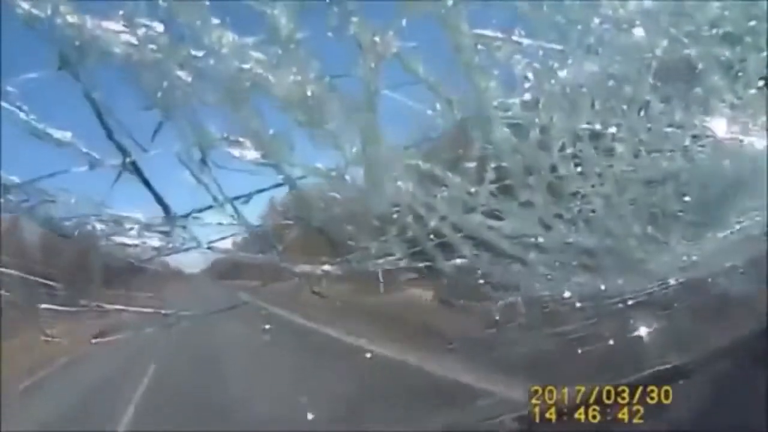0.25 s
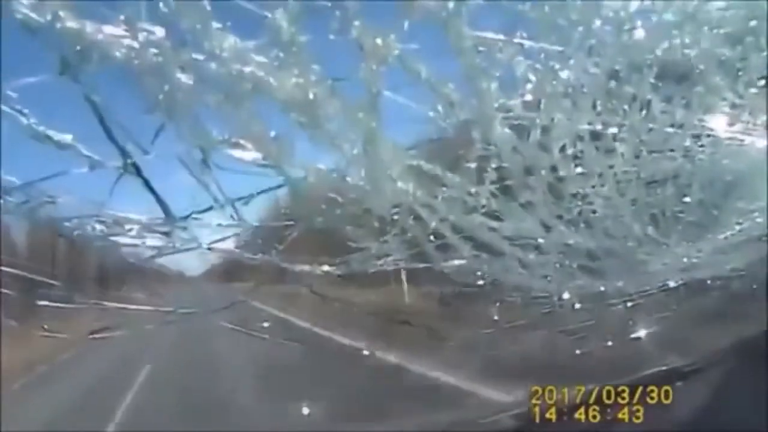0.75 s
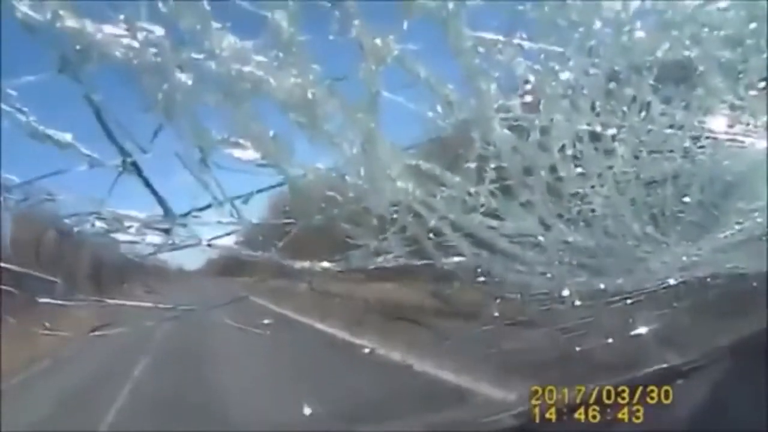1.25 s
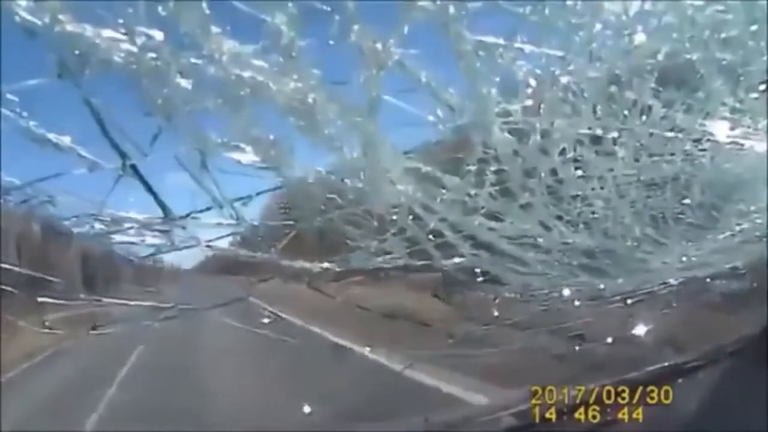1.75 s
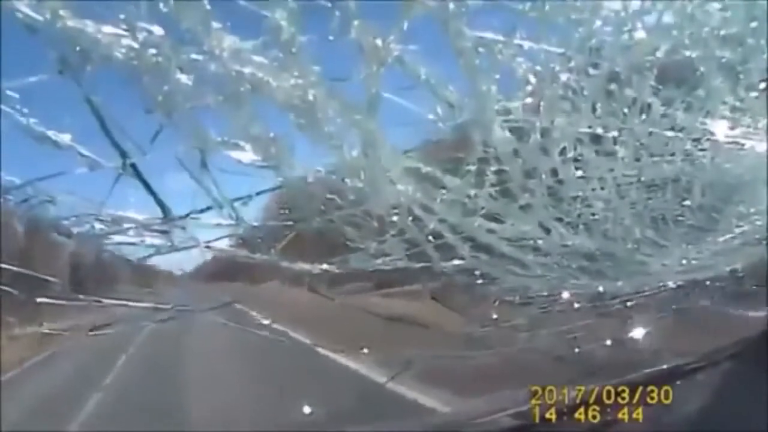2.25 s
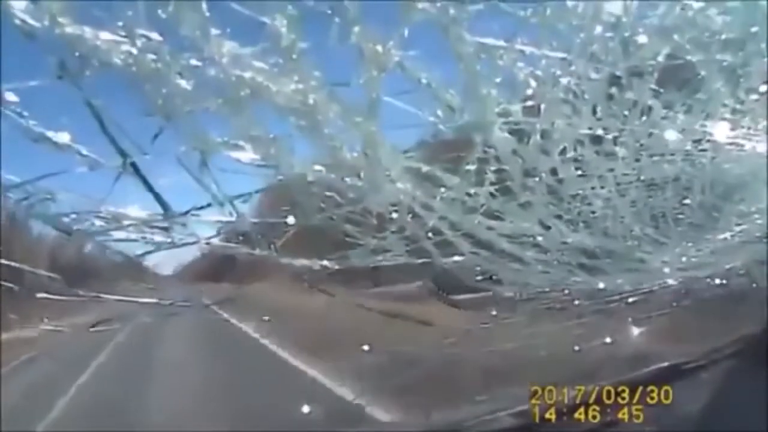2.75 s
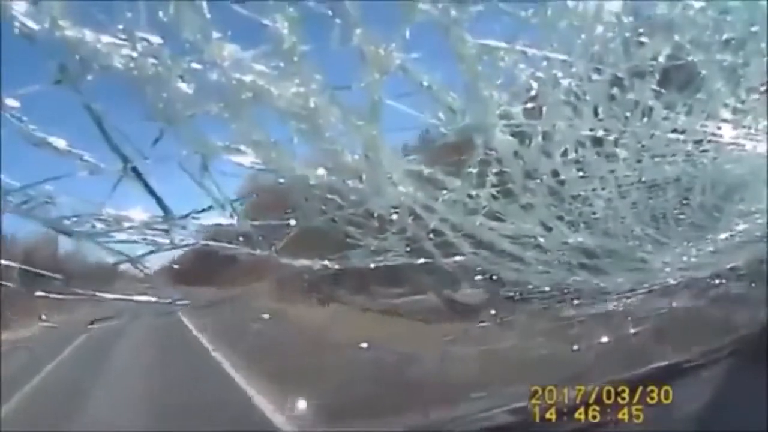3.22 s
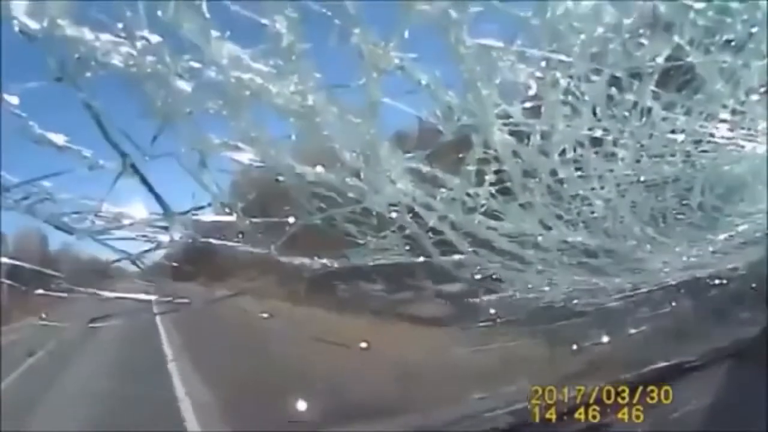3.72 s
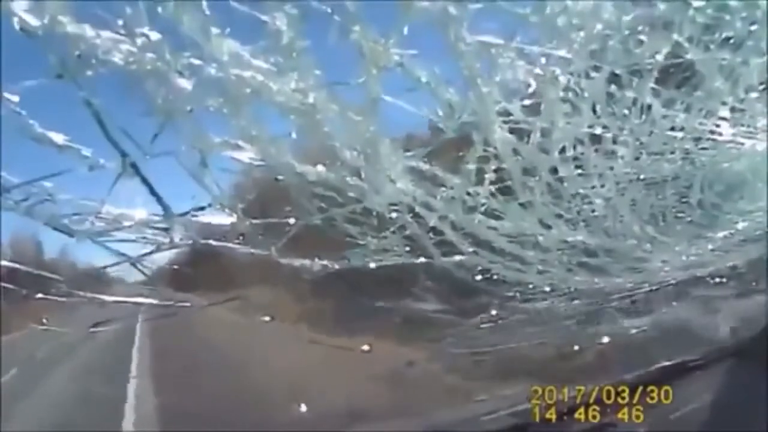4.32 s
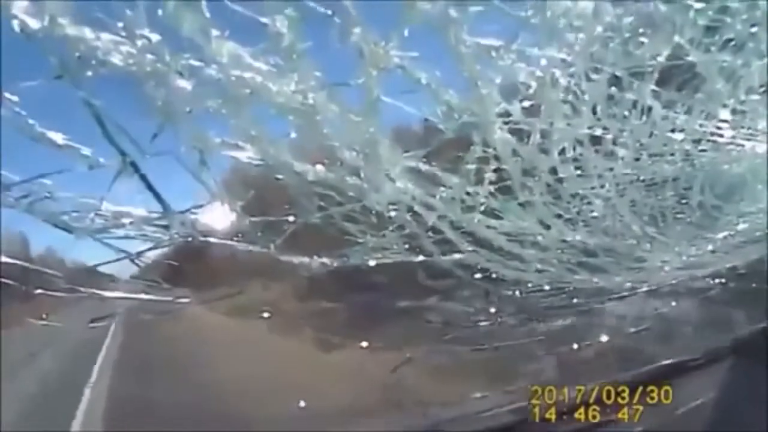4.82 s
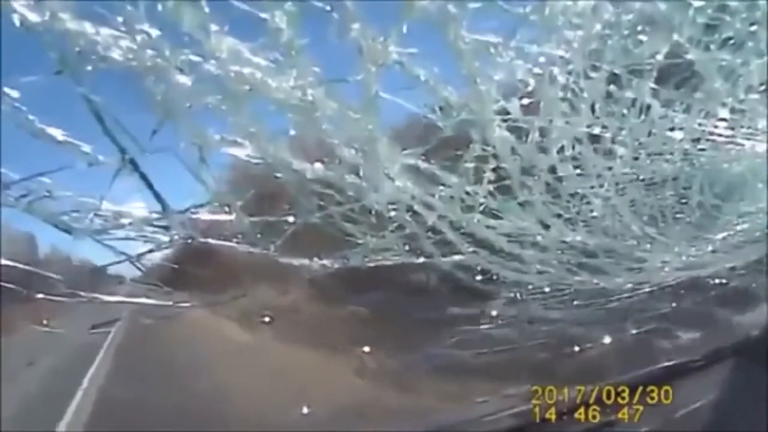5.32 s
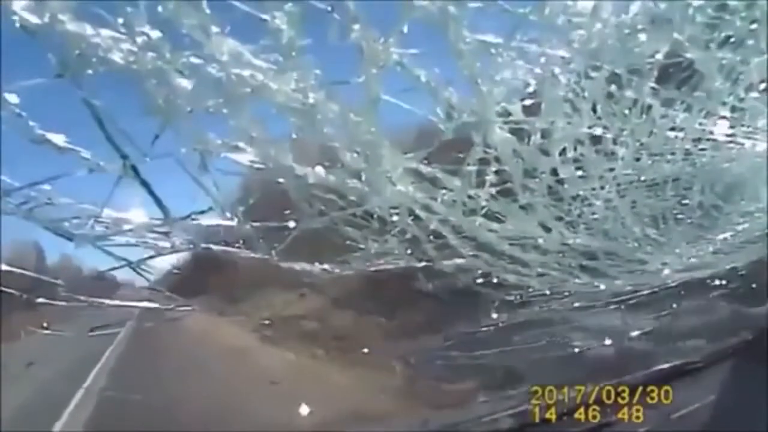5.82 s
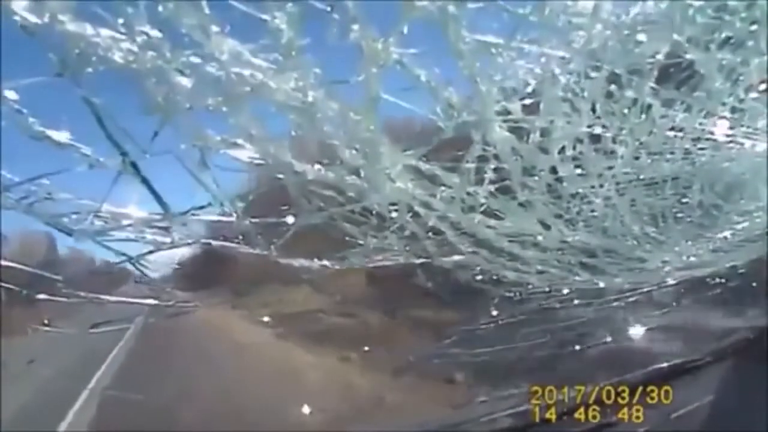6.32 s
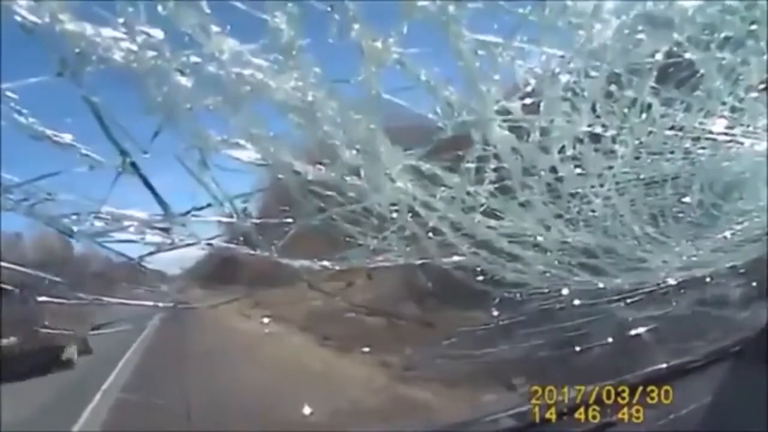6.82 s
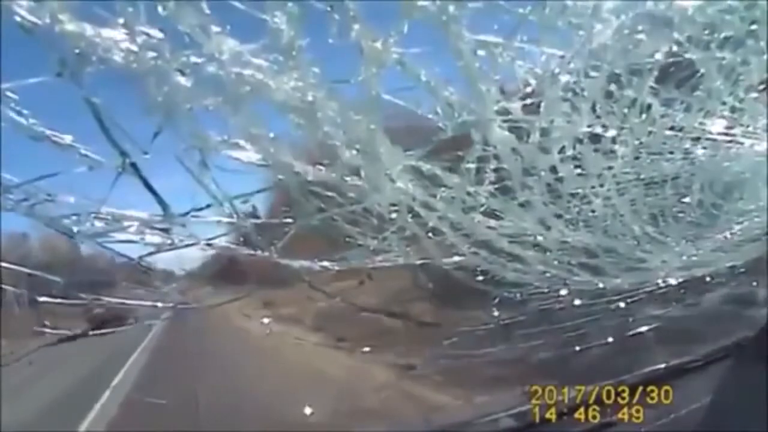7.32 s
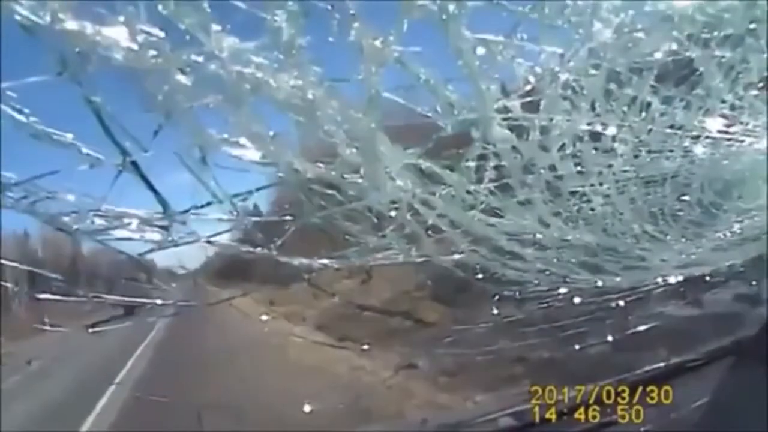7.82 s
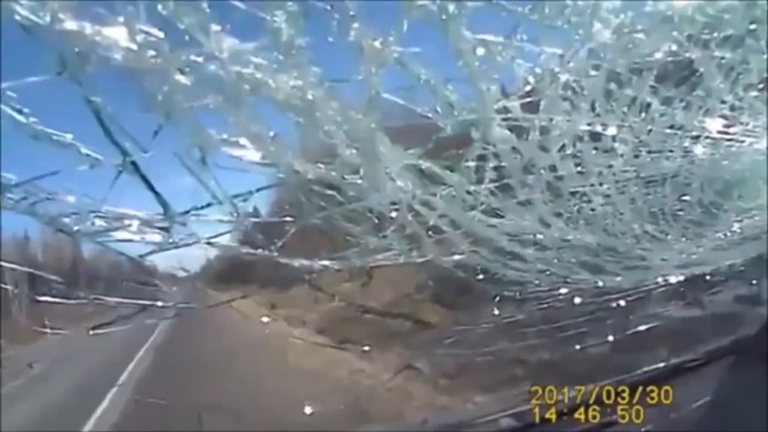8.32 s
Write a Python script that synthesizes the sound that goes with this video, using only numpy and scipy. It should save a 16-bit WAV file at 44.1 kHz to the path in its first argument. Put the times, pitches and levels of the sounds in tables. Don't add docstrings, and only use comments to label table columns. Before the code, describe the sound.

Inside a car cabin, through a cheap, muffled dashboard camera with constant hiss, a thin high buzzing whine and small watery dropouts. From 0 to 3 s, broad tyre roar, low body rumble and airy wind past shattered glass gradually fade as the car slows. Two light knocks come at about 3.0 and 3.1 s. From 3.4 to 3.9 s it bumps hard onto the verge: dense, hollow dash clatter, deep body thuds and brittle glass ticks, hardest near 3.7 s, harshly overloaded, with a deep flutter of cabin air. Smaller rattles and ticks follow at 4.0 to 4.35 s, and a faint knock at 4.7 s. The cabin is then quieter. Another car's tyre noise rises from about 5 s, swells at 6.1 and strongest at 6.7 s, then recedes, duller, to 8.5 s. A slight knock sounds at 6.3 s, a short clatter at 7.3 s and a glass tick at 7.5 s.

```python
import sys
import numpy as np
from scipy import signal
from scipy.fft import rfft, irfft, next_fast_len
from scipy.io import wavfile
from scipy.ndimage import uniform_filter1d

SR = 44100
rng = np.random.default_rng(int(sys.argv[2]) if len(sys.argv) > 2 else 0)


def dump(signal):
    limited = np.clip(np.atleast_2d(signal).T, -1, 1)
    pcm = np.round(limited * 32767).astype(np.int16)
    wavfile.write(sys.argv[1], SR, pcm)


def voltage_ratio(level):
    return 10 ** (np.asarray(level, float) / 20)


N = 377496

# (frequency [Hz], level per Hz [dB])
HISS = [(100, -45), (400, -1.5), (1500, -6), (3500, -5.5), (5000, -5), (6500, -1.5), (7300, 1)]
WHINE_HZ = [1810.6, 2935.95, 4061.3, 5186.65, 6312.0, 7437.35]
WHINE_DB = [-48, -50, -44, -39, -31.5, -21.5]
# (frequency [Hz], average level [dB])
CLOCK = [(1125.35, -50), (2250.7, -55)]
# (frequency [Hz], level per Hz [dB])
BUFFET = [(15, -22), (25, -2), (45, 2), (80, -9), (120, -7.5)]
# (time [s], peak level [dB], half length [s])
GUSTS = [
    (3.7, -32, .55),
    (5.3, -42, .3),
    (6.3, -42, .3),
    (7.4, -40, .4),
]
# (frequency [Hz], level per Hz [dB])
WIND = [(1200, -33), (1600, -2), (2000, 3), (2600, 6.5), (3100, -2.5), (4500, -6), (7000, -12)]
# (frequency [Hz], level per Hz [dB])
ALONGSIDE = [(180, -41), (300, -19), (362, -25.5), (444, -12), (589, -6), (696, -3.5), (924, -0.5),
             (1180, -3.5), (1700, -25), (2210, -39), (3740, -120)]
# (frequency [Hz], level per Hz [dB])
LEAVING = [(180, -48), (300, -39), (387, -7.5), (419, -31), (460, -7), (589, -6), (643, 2.5), (823, 2),
           (1700, -18.5), (2210, -56), (3740, -120)]
LEAVES_S = [7.3, 7.67]
# (time [s], level [dB])
OTHER_CAR = [
    (4.7, -52),
    (5.3, -40),
    (6.11, -26.5),
    (6.32, -32),
    (6.73, -24.5),
    (7.3, -28.5),
    (7.65, -30.5),
    (7.9, -28.5),
    (8.3, -31),
]
# (frequency [Hz], level per Hz [dB])
RUMBLE = [(24, -56), (40, -20.5), (124, -4), (188, -3.5), (238, -5.5), (313, -0.5), (450, -10), (580, -48),
          (990, -120)]
# (frequency [Hz], level per Hz [dB])
ROAR = [(240, -14), (400, -3), (476, -4), (633, 3), (757, 3), (855, -0.5), (938, 2.5), (1050, 3),
        (1600, -12.5), (2080, -40), (3520, -120)]
# (time [s], level [dB])
SPEED = [(0, -14.5), (.5, -15), (1.2, -16.5), (1.76, -17.5), (2.2, -21.5), (2.7, -24), (3.05, -23.5),
         (3.42, -28), (4.4, -37.5), (5.0, -38), (5.6, -41.5), (8.56, -41.5)]
# (time of deepest swing [s], peak level [dB], pitch [Hz], length [cycles])
THUDS = [
    (3.454, -18, 110, 1.2),
    (3.471, -14, 191, 1.6),
    (3.633, -11, 61, 0.58),
    (3.7043, 1.5, 109, 0.43),
    (3.722, 0, 212, 0.51),
    (4.039, -24, 191, 2.3),
    (4.189, -27, 175, 2.6),
    (4.261, -21, 245, 1.35),
]
# (time [s], peak level [dB], ring [Hz])
CHIPS = [
    (3.518, -8, 2630),
    (3.742, -29, 3600),
    (3.772, -19, 2460),
    (4.118, -18, 3150),
    (4.257, -12, 1900),
    (4.347, -18, 3000),
    (7.493, -15, 2800),
    (7.283, -18.5, 3400),
]
# (frequency [Hz], width [Hz], level [dB])
PANEL = [(269, 720, -15.5), (500, 140, -3), (760, 1320, -0.5), (1050, 300, 0.5), (1350, 380, -22.5)]
# (frequency [Hz], width [Hz], level [dB])
BRITTLE = [(1400, 630, 0), (1810, 850, 3.5), (2470, 310, 9), (2970, 500, 2), (4000, 1200, -3.5),
           (5070, 490, -5.5), (6200, 1500, -11)]
# (time [s], panel peak [dB], brittle peak [dB], length [s], loudest ring [Hz])
BLOWS = [(3.011, -18, -21, .027, 483), (3.144, -19, -19.5, 0.027, 860), (3.447, 5, .5, 0.083, 760),
         (3.517, -3.5, -8, 0.031, 646), (3.616, 6, 2, 0.031, 760), (3.769, -0.5, -17, 0.038, 1150),
         (3.811, -2, -17, 0.063, 637), (4.037, -21, -17.5, 0.091, 600), (4.109, -40, -27.5, 0.012, 1000),
         (4.252, -8, -11, 0.045, 1080), (4.73, -23, -36, .07, 910), (6.285, -28, -21, .014, 1000),
         (7.282, -8, -14.5, 0.031, 1050)]
# (time [s], panel peak [dB], brittle peak [dB], length [s], loudest ring [Hz])
RATTLES = [(3.466, -3.5, -14, 0.049, 1010), (3.497, -11, -16, .02, 790), (3.527, -6.5, -16, 0.041, 720),
           (3.637, -3, -13, .024, 935), (3.656, -9.5, -22, 0.079, 755), (3.701, -6.5, -16.5, 0.044, 970),
           (3.733, -4, -18, 0.0193, 586), (3.759, -26, -13, 0.014, 850), (3.821, -7, -19.5, 0.093, 860),
           (3.912, -22, -22, .027, 900), (4.042, -16.5, -41, 0.023, 910), (4.175, -13, -23, .016, 1050),
           (4.186, -15.5, -18, 0.032, 1210), (4.238, -12.5, -13.5, 0.015, 500),
           (7.276, -27, -19, 0.0066, 900)]
STARVED_S = [.823, 1.283, 1.463, 1.542, 1.712, 1.977, 2.061, 2.246, 2.823, 3.212, 3.587, 3.895, 3.976, 4.53,
             4.657, 4.893, 4.919, 4.963, 5.107, 5.282, 5.32, 5.404, 5.581, 5.638, 5.703, 5.981, 6.308,
             6.434]
STARVED_LATE_S = [7.046, 7.457, 7.629, 7.815, 7.926, 8.013, 8.112]
THINNED_S = [.328, 1.263, 1.438, 5.021, 5.191, 1.756, 3.406, 3.721, 4.028, 4.572]
# (start [s], end [s])
BUSY = [
    (2.98, 3.06),
    (3.43, 4.36),
    (6.24, 6.34),
    (7.23, 7.36),
    (7.47, 7.56),
]
IMAGE_DB = [-31, -45]


def rms_one(x):
    return x / np.sqrt(np.mean(x ** 2) + 1e-20)


def drift(rate):
    r = np.exp(-80 * np.pi * rate / SR)
    wander = signal.lfilter([1], [1, -2 * r, r * r], rng.standard_normal(N // 40 + 2002))
    return rms_one(wander[2000:])


def gain_of(db):
    return np.interp(np.arange(N) / 40, np.arange(len(db)), voltage_ratio(db))


def coloured(spectrum, shared_db, patchy_db, rate):
    size = next_fast_len(N, real=True)
    log_hz = np.log2(np.fft.rfftfreq(size, 1 / SR) + 1)
    points = np.array(spectrum, float)
    shape = voltage_ratio(np.interp(log_hz, np.log2(points[:, 0]), points[:, 1], left=-90, right=-90))
    noise = rfft(rng.standard_normal(size)) * shape
    together, out = drift(rate), 0
    audible = points[points[:, 1] > -45, 0]
    for centre in np.arange(np.log2(audible[0]), np.log2(audible[-1]) + .5, .5):
        share = np.clip(1 - np.abs(log_hz - centre) * 2, 0, 1)
        band = irfft(noise * share, size)[:N]
        out = out + gain_of(shared_db * together + patchy_db * drift(2 * rate)) * band
    return rms_one(out)


def resonances(x, peaks):
    out = 0
    for k, (hz, width, db) in enumerate(peaks):
        r = np.exp(-np.pi * width / SR)
        b = np.array([1, 0, -1]) * (1 - r * r) / 2
        ring = signal.lfilter(b, [1, -2 * r * np.cos(2 * np.pi * hz / SR), r * r], x)
        out = out + (-1) ** k * voltage_ratio(db) * ring
    return out


def fall_in_speed_db():
    roar_db = np.interp(np.arange(N) / SR, *np.transpose(SPEED))
    return roar_db - roar_db[0]


def amplifier_hiss():
    return voltage_ratio(-33) * coloured(HISS, shared_db=-1.3, patchy_db=1.1, rate=11.0)


def whine():
    frame_hz, frame_start_s = 65.365, .01084
    t = np.arange(N) / SR
    flip = np.where(np.floor((t - frame_start_s) * frame_hz) % 2 == 0, 1, -1)
    phases = rng.uniform(0, 2 * np.pi, len(WHINE_HZ))
    flipping = 0
    for hz, db, phase in zip(WHINE_HZ, WHINE_DB, phases):
        flipping = flipping + gain_of(db + 1.04 * drift(11)) * np.sin(2 * np.pi * hz * t + phase)
    steady = sum(voltage_ratio(db) * np.sin(2 * np.pi * hz * t) for hz, db in CLOCK)
    return np.sqrt(2) * (flip * flipping + steady)


def cabin_buffet():
    t = np.arange(N) / SR
    pumping = voltage_ratio(-56)
    for s, db, half_length in GUSTS:
        pumping = pumping + voltage_ratio(db) * np.exp(-((t - s) / half_length) ** 2)
    return pumping * coloured(BUFFET, shared_db=3, patchy_db=2.5, rate=6)


def wind():
    level_db = -25.5 + 0.76 * fall_in_speed_db()
    return voltage_ratio(level_db) * coloured(WIND, shared_db=1.87, patchy_db=1.54, rate=1.9)


def passing_car():
    t = np.arange(N) / SR
    away = np.interp(t, LEAVES_S, [0, 1])
    near = np.sqrt(1 - away) * coloured(ALONGSIDE, shared_db=.7, patchy_db=.9, rate=16)
    leaving = np.sqrt(away) * coloured(LEAVING, shared_db=1.8, patchy_db=-1.0, rate=15)
    return voltage_ratio(np.interp(t, *np.transpose(OTHER_CAR))) * (near + leaving)


def body_rumble():
    level_db = -24.5 + 0.71 * fall_in_speed_db()
    return voltage_ratio(level_db) * coloured(RUMBLE, shared_db=-2.0, patchy_db=0.5, rate=11.0)


def tyre_roar():
    roar_db = np.interp(np.arange(N) / SR, *np.transpose(SPEED))
    return voltage_ratio(roar_db) * coloured(ROAR, shared_db=1.4, patchy_db=1.2, rate=14)


def thuds():
    out, t = np.zeros(N), np.arange(-SR // 10, SR // 10) / SR
    for s, db, hz, cycles in THUDS:
        at = round(s * SR) - SR // 10
        swing = np.cos(2 * np.pi * hz * t) * np.exp(-(t * hz / cycles) ** 2)
        out[at:at + len(t)] -= voltage_ratio(db) * swing
    return out


def chips():
    t60_s, width_hz = 0.05, 800
    out, t = np.zeros(N), np.arange(SR // 20) / SR
    for s, db, hz in CHIPS:
        grind = rng.standard_normal(len(t)) * voltage_ratio(-60 * t / t60_s) * (1 - np.exp(-t / .002))
        tick = resonances(grind, [(hz, width_hz, 0)])
        out[round(s * SR):][:len(t)] -= voltage_ratio(db) * tick / tick[np.abs(tick).argmax()]
    return out


def knocks():
    out, t = np.zeros(N), np.arange(SR // 7) / SR
    panel_filter = signal.butter(2, 700, fs=SR, output="sos")
    rows = [(3.0, *row) for row in BLOWS] + [(12.4, *row) for row in RATTLES]
    for lengths, s, panel_db, brittle_db, length, hz in rows:
        t60 = max(lengths * length, .01)
        strength = voltage_ratio(1.9 * np.minimum(rng.exponential(1, (2, len(t))), 5))
        contacts = rng.standard_normal((2, len(t))) * strength
        rattle = contacts * np.clip((length - t) / .005, 0, 1) * voltage_ratio(-60 * t / t60)
        panel = resonances(rattle[0] * (1 - np.exp(-t / .0018)), PANEL + [(hz, 170, 5)])
        panel = signal.sosfilt(panel_filter, panel)
        sharp = rattle[1] * voltage_ratio(-35 * t / t60) * (1 - np.exp(-t / 0.00059))
        brittle = resonances(sharp, BRITTLE)
        at = round(s * SR)
        out[at:at + len(t)] += voltage_ratio(panel_db) * panel / np.abs(panel).max()
        out[at:at + len(t)] += voltage_ratio(brittle_db + 2.0) * brittle / np.abs(brittle).max()
    return out


def short_blocks():
    block_s, start_s, gap_s = 1024 / 48000, .0105, .0145
    lean_share, lean_loss = .035, .55
    draws = rng.random((int(N / SR / block_s), 3))
    loss = lean_loss * (draws[:, :1] < lean_share) * (.5 + draws[:, 1:])
    for times, bands in [(STARVED_S + STARVED_LATE_S, [1, 1]), (THINNED_S, [.3, 1])]:
        loss[np.round((np.array(times) - start_s) / block_s).astype(int)] = bands
    t, gone = np.arange(N) / SR, np.zeros((2, N))
    for k in np.flatnonzero(loss.any(axis=1)):
        at = start_s + k * block_s
        near = slice(max(round((at - gap_s) * SR), 0), round((at + gap_s) * SR))
        window = np.clip(1.5 * np.cos(np.pi / 2 * (t[near] - at) / gap_s) ** 2, 0, 1)
        gone[:, near] = np.minimum(gone[:, near] + loss[k][:, None] * window, 1)
    return gone


def starve(sound):
    hz, s, frames = signal.stft(sound, SR, nperseg=1024, noverlap=768)
    size = np.abs(frames)
    above = size / np.sqrt(uniform_filter1d(size ** 2, size=31, axis=0))
    lost = frames * np.interp(above, [1.5, 1.8], [1, -.7])
    holes = rng.random((len(hz) // 5 + 1, len(s) // 7 + 1)) < .035
    patches = np.repeat(np.repeat(holes, 5, axis=0), 7, axis=1)[:len(hz), :len(s)]
    share = 0.7 * patches * ((hz > 1400) & (hz < 6000))[:, None]
    gone = short_blocks()
    out = signal.istft(frames - share * lost, SR, nperseg=1024, noverlap=768)[1][:N]
    for row, (low_hz, high_hz) in enumerate([(400, 2900), (2900, 6000)]):
        reach = (hz > low_hz) * (hz <= high_hz) * np.interp(hz, [400, 1500], [.45, 1])
        inside = (1 - share) * reach[:, None]
        part = signal.istft(lost * inside, SR, nperseg=1024, noverlap=768)[1]
        out = out - .85 * gone[row] * part[:N]
    return out


def offset(centre):
    block, step = 1024, .022
    draws = rng.random((N // block + 2, 2))
    new = np.maximum.accumulate(np.where(draws[:, 0] < .45, np.arange(len(draws)), 0))
    steps = np.round(4 * draws[new, 1] - 2)
    smooth = uniform_filter1d(uniform_filter1d(np.repeat(steps, block), size=500), size=500)
    return centre + step * smooth[:N]


def scene():
    camera = amplifier_hiss() + whine()
    driving = cabin_buffet() + wind() + passing_car() + body_rumble() + tyre_roar()
    bumps = thuds() + chips() + knocks()
    return starve(camera + driving + bumps)[None]


def top_cut(x):
    return signal.sosfilt(signal.butter(12, 15830, fs=SR, output="sos"), x)


def record(dry):
    centre, cutoff_hz, busy_top_hz = -.285, 7225, 7315
    t, hz = np.arange(N) / SR, np.fft.rfftfreq(N, 1 / SR)
    spectrum = rfft(np.clip(dry[0] + offset(centre), -1.05, 1.05) - centre)
    busy_times = np.ravel([(a - .02, a, b, b + .02) for a, b in BUSY])
    busy = np.interp(t, busy_times, [0, 1, 1, 0] * len(BUSY))
    edge = irfft(spectrum * (hz > cutoff_hz) * (hz < busy_top_hz), N)
    extra = rfft(voltage_ratio(-3) * busy * edge)
    cut_db = np.interp(hz, [cutoff_hz, 7300, 7400, 7600, 7800], [0, -16, -40, -40, -60])
    spectrum = extra + spectrum * voltage_ratio(cut_db)
    tilt_db = np.interp(hz, [5200, 6300, 7200], [-5, 0, 3])
    top = spectrum * (hz > 5050) * (hz < busy_top_hz) * voltage_ratio(tilt_db)
    shift = round(3900 * N / SR)
    for k, db in enumerate(IMAGE_DB):
        spectrum = spectrum + voltage_ratio(db) * np.roll(top, (k + 1) * shift)
    wave = irfft(spectrum, N) + centre
    knee, bend = .78, .4
    over = np.clip(np.abs(wave) - knee, 0, 1)
    wave = np.clip(wave - np.sign(wave) * bend * over ** 2, -1, 1)
    return top_cut(wave[None])


dry = scene()
out = record(dry)
dump(out)
```